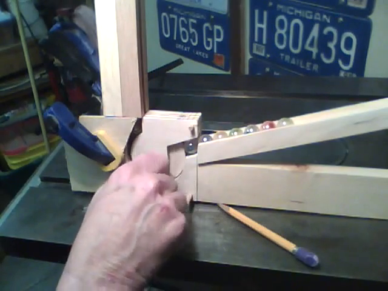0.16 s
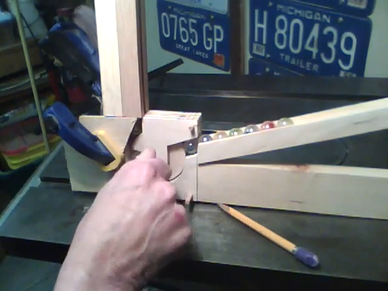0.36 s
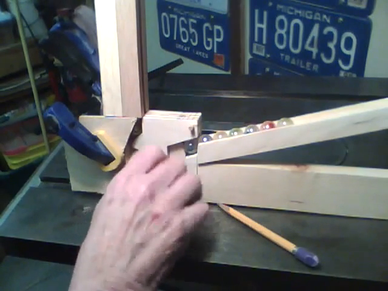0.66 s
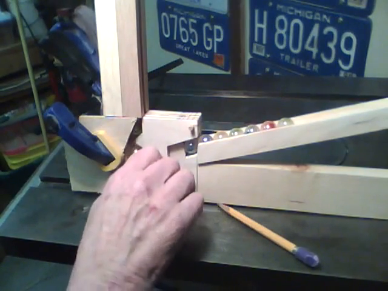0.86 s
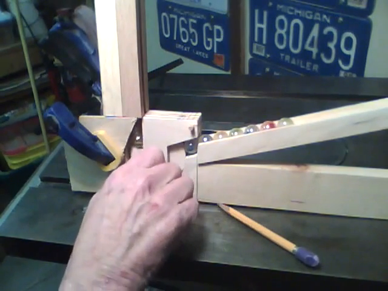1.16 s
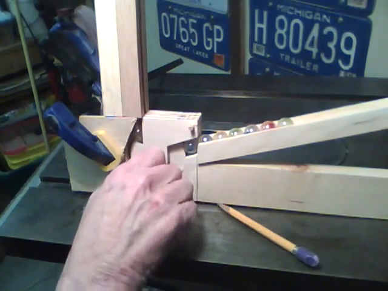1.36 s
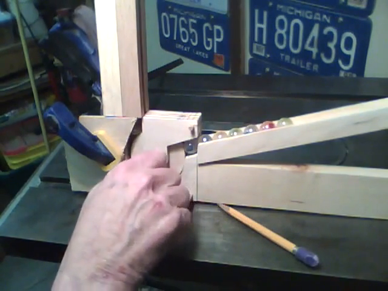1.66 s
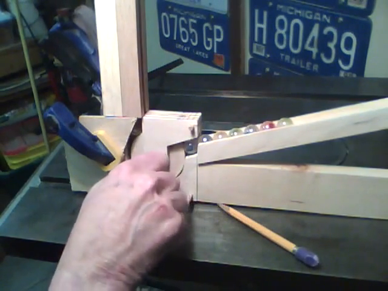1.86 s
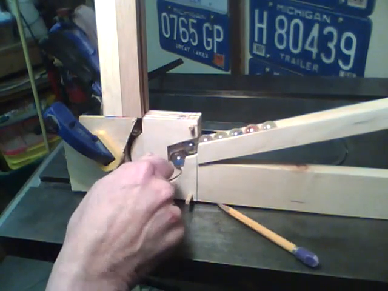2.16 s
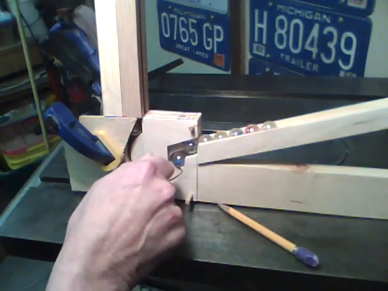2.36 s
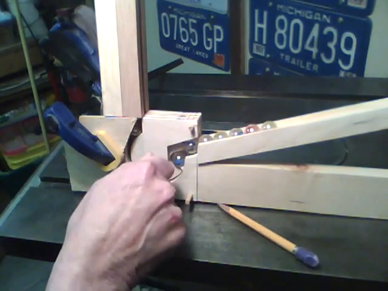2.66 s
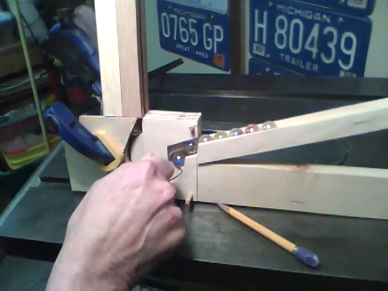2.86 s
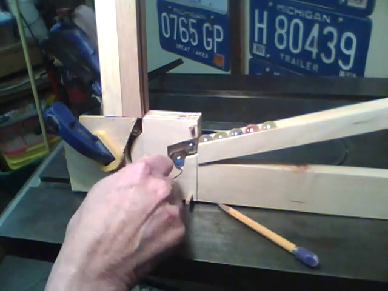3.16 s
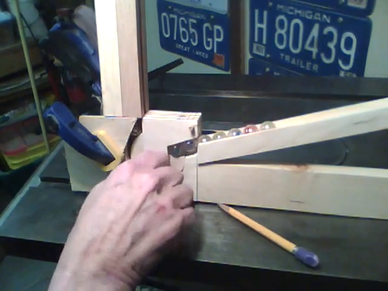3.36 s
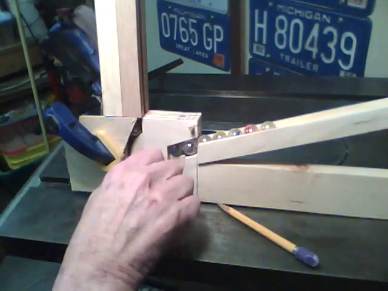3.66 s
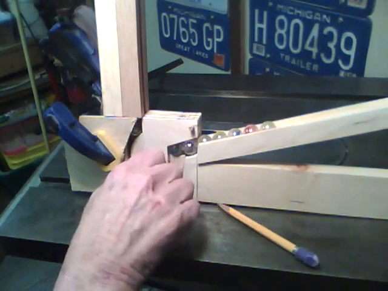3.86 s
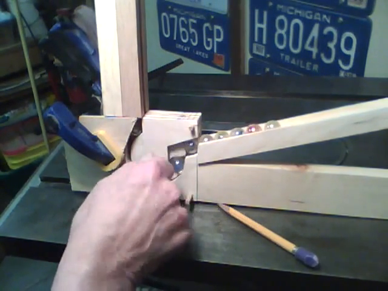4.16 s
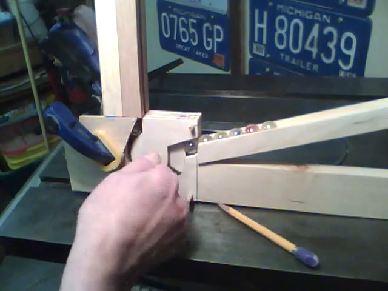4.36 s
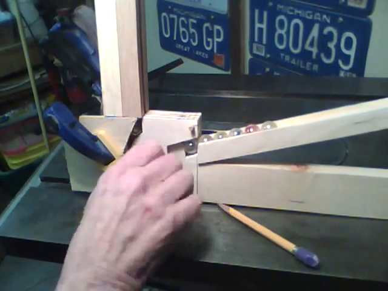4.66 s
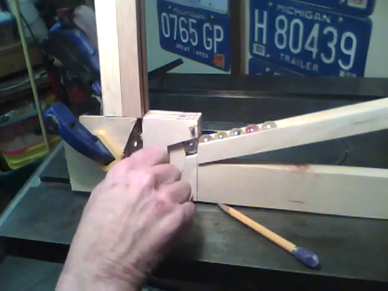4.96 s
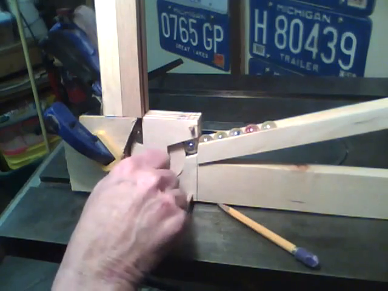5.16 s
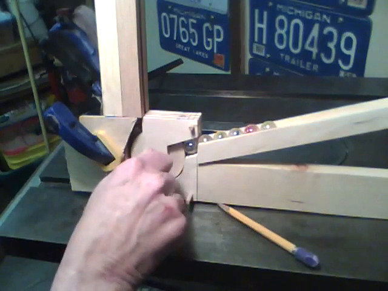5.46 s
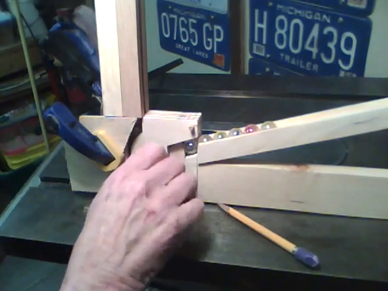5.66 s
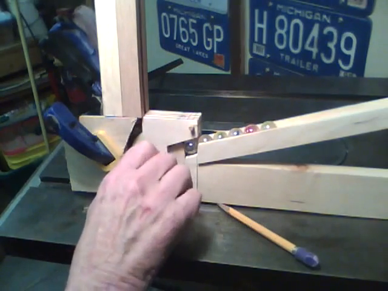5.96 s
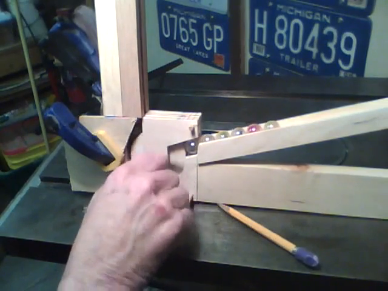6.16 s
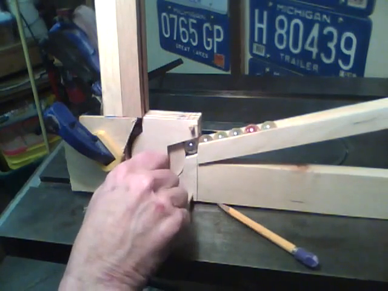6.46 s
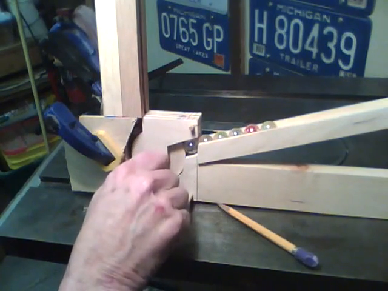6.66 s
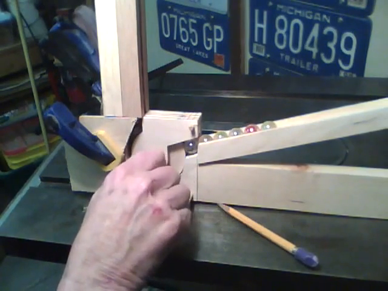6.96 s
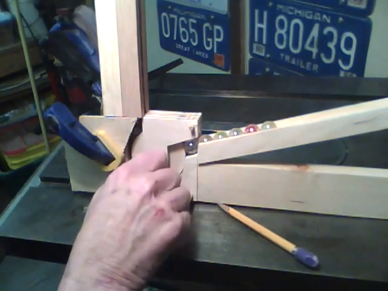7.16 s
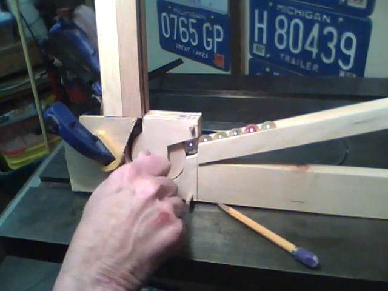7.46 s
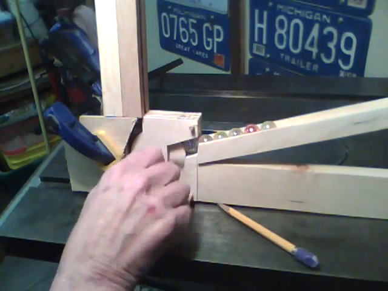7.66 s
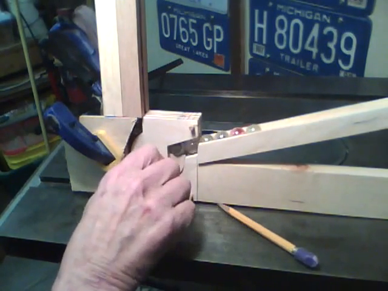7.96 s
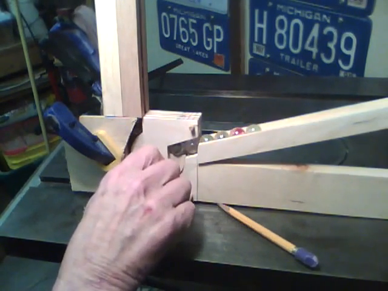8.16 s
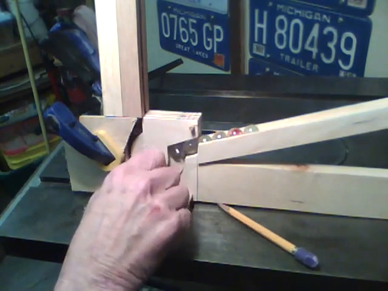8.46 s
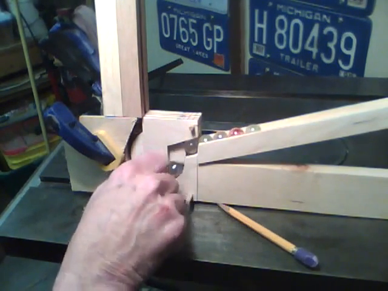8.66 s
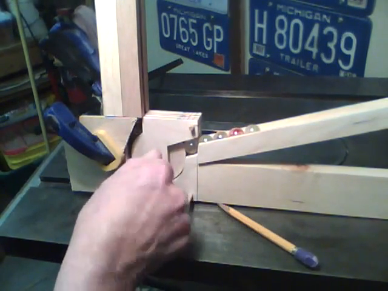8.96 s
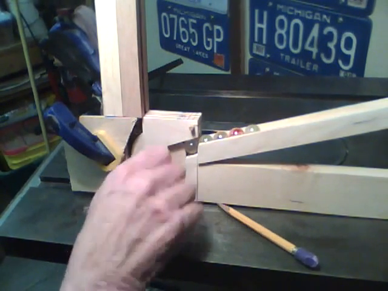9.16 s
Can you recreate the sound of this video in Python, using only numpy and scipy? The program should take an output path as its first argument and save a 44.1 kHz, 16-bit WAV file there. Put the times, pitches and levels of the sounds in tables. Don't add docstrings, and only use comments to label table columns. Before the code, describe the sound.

Close camera microphone in a small workshop: glass marbles tap each other and strike a wooden block and ramp. Isolated knocks come first, then a rapid cluster around five seconds, one strongest crack at about six, a pause, and another cluster near eight. Faint dry scraping and a couple of tiny ticks sit between them. A steady low motor hum with gentle hiss runs underneath throughout.

```python
import sys
import numpy as np
from scipy import signal
from scipy.fft import rfft, irfft, next_fast_len
from scipy.io import wavfile
from scipy.ndimage import uniform_filter1d, map_coordinates

SR = 44100
rng = np.random.default_rng(int(sys.argv[2]) if len(sys.argv) > 2 else 0)


def amplitude_ratio(level_db):
    exponent = np.asarray(level_db, float) / 20
    return 10 ** exponent


def int16_out(signal):
    q = np.round(np.clip(np.atleast_2d(signal).T, -1, 1) * 32767)
    wavfile.write(sys.argv[1], SR, q.astype(np.int16))


N = 411453
HISS_TOP_HZ = 15750

# (centre [Hz], width [Hz], level [dB])
THUD_MODES = [(466, 63, -2), (729, 58, 1.5), (1044, 480, -1), (1434, 434, 1.5)]
BLOCK_MODES = [(1580, 650, -11.5), (1938, 150, 3), (2210, 200, 0), (2460, 206, 0), (2850, 290, -1.5),
               (3210, 670, -7.5)]
RAMP_MODES = [(3650, 600, -2.5), (4370, 390, 2), (4740, 450, 1.9), (5550, 650, -4)]
GLASS_MODES = [(6040, 760, -1.5), (7130, 600, -1.5), (7600, 570, 1), (8440, 670, -2), (9420, 910, -5.5)]


def along(points, hz):
    point_hz, value = np.transpose(points)
    return np.interp(np.log(hz + 1), np.log(point_hz + 1), value)


def coloured(gain):
    size = next_fast_len(N)
    white = rfft(rng.standard_normal(size)) * np.sqrt(SR / 2)
    return irfft(white * gain(np.fft.rfftfreq(size, 1 / SR)), size)[:N]


def wobble(rate_hz):
    knots = rng.standard_normal(int(N * rate_hz / SR) + 4)
    return map_coordinates(knots, [np.arange(N) * rate_hz / SR], order=1)


def peak(hz, centre_hz, width_hz):
    damping = 1j * hz * width_hz
    return damping / (centre_hz ** 2 - hz ** 2 + damping)


def background():
    # (frequency [Hz], density [dB per Hz])
    rush = [(25, -95), (45, -88), (95, -85), (180, -77.5), (280, -82.5), (385, -90), (450, -80.5),
            (1000, -82.5), (1080, -87), (1700, -91), (2600, -98), (3200, -99), (8000, -101.5),
            (15700, -103)]
    # (centre [Hz], width [Hz], top density [dB per Hz])
    hums = [(55.5, 11.3, -74.5), (119, 8.8, -81.5), (159.9, 14, -72), (178.5, 18, -71), (210.6, 19, -74),
            (239.6, 13.7, -70.5), (323.5, 46, -75), (469.5, 130, -77.5), (755, 216, -77.5),
            (789, 25, -78.5), (962.4, 49, -70.5), (1188, 94, -85.5), (1366, 110, -83.5), (1610, 49, -86),
            (1946, 67, -89.5), (2130, 54, -90.5), (2296, 83, -94.5), (12806, 60, -97), (12600, 760, -101)]

    def gain(hz):
        hum_power = sum(amplitude_ratio(2 * db) * np.abs(peak(hz, centre_hz, width_hz)) ** 4
                        for centre_hz, width_hz, db in hums)
        return np.sqrt(amplitude_ratio(2 * along(rush, hz)) + hum_power) * (hz < HISS_TOP_HZ)

    steady = coloured(gain)
    return amplitude_ratio(0.46 * wobble(2.52)) * steady


def tones():
    # (frequency [Hz], level [dB rms])
    steady_lines = [
        (161.3, -60.5),
        (206.3, -55.5),
        (240.1, -55.5),
        (12806, -74),
    ]
    # (time [s], level [dB rms])
    drone_path = [
        (7.3, -85),
        (7.6, -69),
        (8.05, -69),
        (8.25, -61),
        (8.6, -61.5),
        (8.8, -85),
    ]
    t = np.arange(N) / SR
    lines = 0
    for hz, db in steady_lines:
        level = amplitude_ratio(db + 1.5 * wobble(4.5))
        lines = lines + level * np.sin(2 * np.pi * hz * t + 0.77 * wobble(6))
    drone_level = amplitude_ratio(np.interp(t, *np.transpose(drone_path)))
    drone = drone_level * np.sin(2 * np.pi * 110.5 * t + .4 * wobble(4))
    return np.sqrt(2) * (lines + drone)


def strokes(rows, rise_db_s, fall_db_s, rest_db):
    t = np.arange(N) / SR
    each = []
    for start_s, hold_s, db in rows:
        rise_db = rise_db_s * np.maximum(start_s - t, 0)
        fall_db = fall_db_s * np.maximum(t - start_s - hold_s, 0)
        each.append(db - rise_db - fall_db)
    return np.maximum(np.max(each, axis=0), rest_db)


def friction(level_db, modes, trim_db, widen, grit_db):
    def gain(hz):
        return sum(amplitude_ratio(db + trim_db) * np.abs(peak(hz, centre_hz, widen * width_hz)) ** 2
                   for centre_hz, width_hz, db in modes)

    noise = coloured(gain)
    return amplitude_ratio(level_db + grit_db * wobble(120)) * noise


def cam():
    # (start [s], hold [s], level [dB])
    rub_strokes = [(.05, 0.24, -63.5), (1.49, 0.062, -62), (1.97, 0.088, -61), (4.1, 0.27, -67),
                   (4.97, .11, -62), (5.27, .01, -56), (6.13, 0.025, -51), (6.25, .02, -59),
                   (7.67, .01, -58), (7.8, .13, -66), (8.4, 0.57, -66.5)]
    # (start [s], hold [s], level [dB])
    roll_strokes = [
        (0, .36, -69.5),
        (7.655, .035, -60.5),
        (7.95, .002, -60),
    ]
    rub_modes = THUD_MODES[2:] + BLOCK_MODES + RAMP_MODES[:1]
    roll_modes = RAMP_MODES[1:] + GLASS_MODES
    rub_db = strokes(rub_strokes, rise_db_s=290, fall_db_s=130, rest_db=-74.5)
    rub = friction(rub_db, rub_modes, trim_db=-39, widen=2.0, grit_db=3.0)
    roll_db = strokes(roll_strokes, rise_db_s=700, fall_db_s=500, rest_db=-76)
    return rub + friction(roll_db, roll_modes, trim_db=-39, widen=1.9, grit_db=2.5)


def contacts():
    # (time [s], strength [dB], spot's ring [Hz], ramp share [dB], glass share [dB])
    blows = [(1.0242, -30, 2170, 2, 3), (1.5816, -25, 2110, -5, -7), (4.0717, -33, 2400, -7, 0.5),
             (4.816, -21.5, 2020, -4.5, -12), (4.8746, -27, 2020, 5.5, -12), (4.9135, -27.5, 2220, -1, -14),
             (5.0095, -22.5, 2310, 2.5, 0.1), (7.8145, -22.5, 2270, -2.5, -19.5),
             (8.526, -37.5, 2210, -6.5, -7.5)]
    # (time [s], strength [dB], spot's ring [Hz], ramp share [dB], glass share [dB])
    rattles = [
        (2.115, -23.5, 2270, -3, -3.5),
        (3.5447, -26.5, 2320, -3, -21),
        (4.85, -33, 2020, 1, -4),
        (5.3246, -28.5, 1950, -2.5, -5),
        (6.1424, -16.5, 2470, -.6, -9.5),
    ]
    # (time [s], strength [dB], spot's ring [Hz], hardness [dB])
    knocks = [(.2291, -41, 2000, -15), (1.0825, -40.5, 2200, -14), (1.1563, -42.5, 2200, -21),
              (1.485, -48, 2280, -5), (1.5093, -55, 2200, -3), (1.951, -51.5, 2100, -7),
              (1.987, -51, 2200, -12.5), (2.0324, -42.5, 2100, -4), (4.0526, -38, 2220, -8),
              (4.0902, -39, 2210, -11), (4.141, -33.5, 2400, -8.5), (4.4318, -43, 2230, -11),
              (4.9629, -45, 2200, -9), (5.0514, -35, 2080, -19), (5.2538, -41.5, 2180, -22),
              (5.2777, -39.5, 1980, -13), (5.3569, -62, 2200, -5), (6.1464, -25, 2470, -30),
              (6.2393, -36.5, 2080, -14), (7.6626, -46, 2170, -12), (7.6739, -55, 2200, -9),
              (7.858, -39.5, 2210, -1), (7.8867, -35.5, 2120, -9), (7.899, -40, 2200, -19),
              (7.9479, -39, 2200, -6), (8.4302, -41, 2140, -16), (8.6236, -38, 2330, -9.5),
              (8.7445, -39, 2030, -12), (8.893, -47, 2180, -21)]
    # (time [s], strength [dB], ramp share [dB], block share [dB], sharpness [dB])
    clicks = [(.0556, -41, -6, -29, -22), (2.0436, -35.5, -6, -12, -12), (2.087, -30.5, -11, -17, -18),
              (2.1212, -25, -2, -40, -9), (3.2496, -36.5, 2.5, -1.5, 3), (3.2603, -36.5, -8, -7, -14),
              (4.188, -46, -2, -1, -11), (4.23, -40.5, -4, -5, -25), (4.2751, -38.5, -8, -6, -15),
              (4.8355, -43, -.1, -16, -5), (4.87, -34.5, -1, -12, -16), (5.03, -38, -5, -30, -15),
              (5.2975, -42, 0, -.1, -14), (5.316, -42, 4, -18, -12), (6.1454, -25, -30, -30, -30),
              (6.273, -41, -10, -7, -11), (6.2942, -39, -1, 0, -9), (6.3017, -33, -13, -6, -18),
              (6.3055, -42, 2, -1, -30), (7.695, -48, 6, 4, -15), (7.906, -37.5, -5.5, -8.5, -8.5),
              (7.9437, -32, -3.5, -12.5, -9.5), (7.9538, -31, -3.5, -8, -8), (8.7198, -37.5, -5, -3, -15.5)]
    # (time [s], strength [dB])
    grazes = [(.0085, -50), (1.854, -56), (8.444, -47.5), (.018, -55), (.0352, -58), (2.0718, -58),
              (4.0248, -58), (4.2091, -52), (4.893, -47), (5.3428, -46), (5.3569, -54), (8.6612, -52),
              (8.6837, -45)]
    # (time [s], level [dB])
    jolts = [(1.0245, -41.5), (1.0817, -41.5), (1.1563, -40.5), (1.484, -46), (1.497, -42), (1.5818, -32.5),
             (2.0324, -42), (2.115, -29), (3.2493, -41), (3.26, -41), (4.052, -38.5), (4.8355, -44),
             (4.85, -33), (4.87, -38), (4.8753, -26.5), (4.9135, -34.5), (5.029, -37), (5.051, -41),
             (5.2088, -34.5), (5.2584, -40), (5.2975, -44), (5.3158, -38), (5.3247, -33.5), (6.1425, -31),
             (6.2385, -39), (7.6739, -42), (7.8584, -41.5), (7.906, -39), (7.9476, -49)]
    block_hz, silent_db, snap_under_glass_db = 2226, -90, -10
    rows = []

    thud_db, lean_oct, tail_db = -12.5, .03, -5
    drops = [(*b, 0) for b in blows] + [(*r, 6) for r in rattles]
    for s, db, hz, ramp_db, glass_db, more_db in drops:
        snap_db = 10 * np.log10(amplitude_ratio(2 * (glass_db + snap_under_glass_db)) + amplitude_ratio(2 * -20.5))
        ramp_lean = lean_oct + .006 * glass_db
        rows.append((s, db + thud_db, db, db + ramp_db, db + glass_db, db + snap_db,
                     np.log2(hz / block_hz), ramp_lean, tail_db + more_db))

    thud_db, lean_oct, knock_tail_db = -6.5, -.11, -1.7
    for s, db, hz, hard_db in knocks:
        glass_db = db + hard_db - 14
        rows.append((s, db + thud_db, db, db + hard_db, glass_db, glass_db + snap_under_glass_db,
                     np.log2(hz / block_hz), lean_oct, knock_tail_db))

    thud_db, lean_oct, tail_db = -5, 0.073, -6.5
    touches = clicks + [(s, db, -1.5, -18, -15) for s, db in grazes]
    for s, db, ramp_db, wood_db, snap_db in touches:
        rows.append((s, db + wood_db + thud_db, db + wood_db, db + ramp_db, db, db + snap_db,
                     0, lean_oct, tail_db))

    rows += [(s, db, *[silent_db] * 4, 0, 0, knock_tail_db) for s, db in jolts]
    return np.transpose(rows)


def struck(modes, db, lean_oct, tail_db, spike, hold_s, fall_db, t60_s, trim_db, size):
    t, hz = np.arange(size) / SR, np.fft.rfftfreq(size, 1 / SR)
    centres_hz, _, mode_db = np.transpose(modes)
    middle_hz = np.sqrt(centres_hz[0] * centres_hz[-1])
    draws = rng.standard_normal((len(db), size + len(modes)))
    early = 1 / (1 + (t / hold_s) ** 3)
    late = amplitude_ratio(fall_db + tail_db + 3)[:, None]
    echoes = draws[:, :size] * (early + late) * amplitude_ratio(-60 * t / t60_s) * (t < .8 * t[-1])
    blow = spike + rfft(echoes) * (hz < HISS_TOP_HZ)
    tilt_db = 55 * lean_oct[:, None] * np.log2(centres_hz / middle_hz)
    bank = np.array([(-1) ** k * peak(hz, c, w) for k, (c, w, _) in enumerate(modes)])
    top = signal.freqz(*signal.butter(8, 16200, fs=SR), worN=hz, fs=SR)[1]
    span_hz = 0.99 * (centres_hz[-1] - centres_hz[0])
    span = peak(hz, middle_hz * 2 ** (1.7 * lean_oct[:, None]), span_hz)
    response = amplitude_ratio(mode_db + tilt_db + draws[:, size:]) @ bank
    rings = irfft(blow * response * span * top, size)
    rings[:, -size // 8:] = 0
    start_rms = np.sqrt(np.mean(rings[:, :SR // 250] ** 2, axis=1))
    return rings * (amplitude_ratio(db + trim_db) / start_rms)[:, None]


def marbles(size=4096):
    # (centre [Hz], width [Hz], level [dB])
    snap_modes = [(10000, 1700, -1.3), (12100, 1700, 0), (13900, 1900, -0.82)]
    # (spike height [1], first echoes [s], tail re echoes [dB], t60 [s], trim [dB])
    decays = [
        (6, 0.001, 0, 0.071, -0.8),
        (6, .004, 1, 0.077, -1.5),
        (6, 0.0029, -6, 0.07, -0.17),
        (7, 0.0038, -2, 0.071, 1.67),
        (9, .002, -2, .06, -0.2),
    ]
    s, *levels_db, block_lean, ramp_lean, tail_db = contacts()
    leans = [0 * s, block_lean, ramp_lean, 0 * s, 0 * s]
    parts = [THUD_MODES, BLOCK_MODES, RAMP_MODES, GLASS_MODES, snap_modes]
    rings = 0
    for modes, db, lean, decay in zip(parts, levels_db, leans, decays):
        rings = rings + struck(modes, db, lean, tail_db, *decay, size=size)
    where = np.round(s * SR).astype(int)[:, None] + np.arange(size)
    return np.bincount(where.ravel(), rings.ravel(), N + size)[:N]


def walls(x):
    # (frequency [Hz], t60 [s])
    room_t60 = [(500, 0.5), (2000, 0.13), (8000, 0.14), (15000, 0.13)]
    hz, t, z = signal.stft(rng.standard_normal(SR // 4), SR, nperseg=256)
    decay = amplitude_ratio(-60 * t / along(room_t60, hz)[:, None])
    tail = signal.istft(z * (hz < HISS_TOP_HZ)[:, None] * decay, SR, nperseg=256)[1]
    delayed = np.pad(x, (400, 0))
    return signal.oaconvolve(delayed, tail / np.linalg.norm(tail))[:N]


def axle():
    # (time [s], peak level [dB], frequency [Hz])
    ticks = [
        (2.3636, -34, 3650),
        (9.0708, -34, 3660),
    ]
    out, t = np.zeros(N), np.arange(SR // 200) / SR
    swell = np.exp(-((t - .0011) / 0.00038) ** 2)
    for s, db, hz in ticks:
        out[round(s * SR):][:len(t)] += amplitude_ratio(db + 1.0) * swell * np.sin(2 * np.pi * hz * t)
    return out


def scene():
    hits = marbles()
    mono = hits + amplitude_ratio(-18.0) * walls(hits) + axle() + cam() + background() + tones()
    return np.array([mono, mono])


def low_pass(x):
    return signal.sosfilt(signal.butter(12, 16970, fs=SR, output="sos"), x)


def record(dry):
    z = signal.stft(dry[0], nperseg=2048)[2]
    moments = uniform_filter1d(rng.standard_normal(z.shape[1]), size=3) > .65
    patches = np.repeat(rng.random((33, z.shape[1])) < .6, 32, axis=0)[:len(z)]
    ceiling = 3 * np.median(np.abs(z), axis=1, keepdims=True)
    blur = np.minimum(np.abs(z), ceiling) * rng.standard_normal(z.shape)
    treble_lift = amplitude_ratio(np.interp(np.arange(len(z)), [0, 150], [-3, 8]))[:, None]
    side = amplitude_ratio(-21.5) * signal.istft(blur * treble_lift * patches * moments, nperseg=2048)[1][:N]
    return low_pass(dry + [side, -side])


dry = scene()
out = record(dry)
int16_out(out)
```